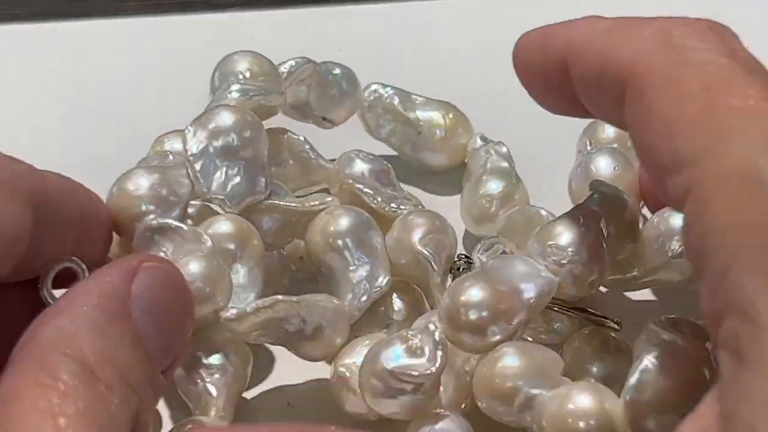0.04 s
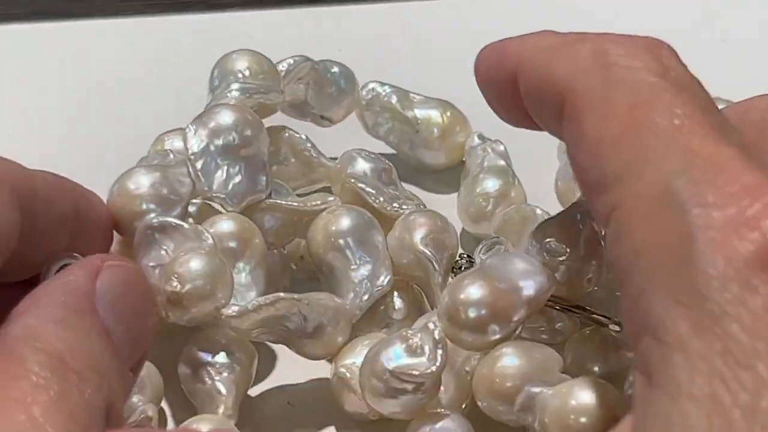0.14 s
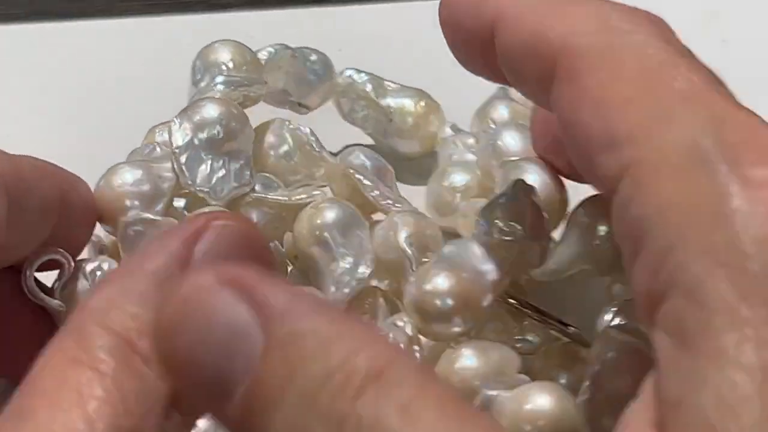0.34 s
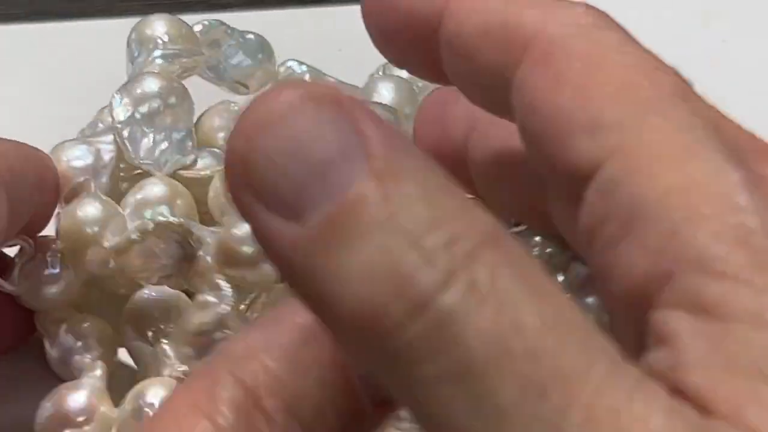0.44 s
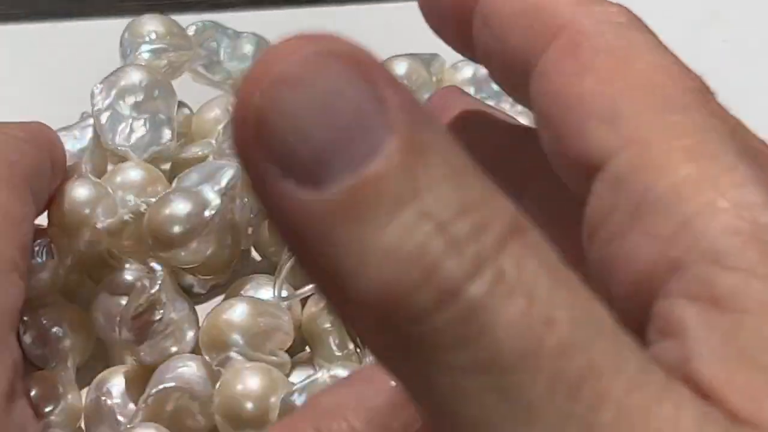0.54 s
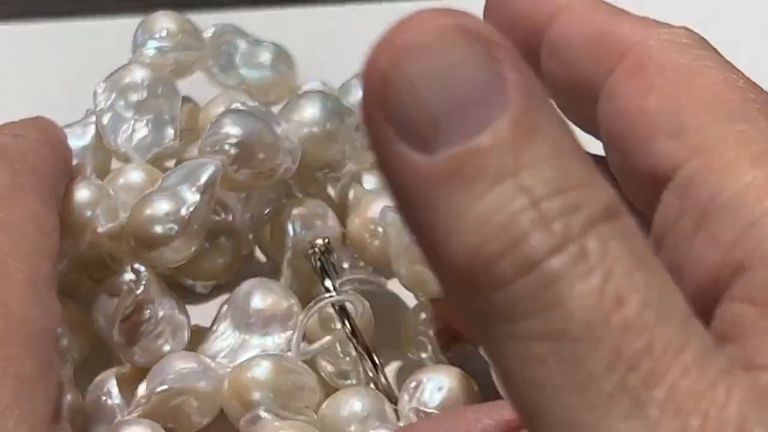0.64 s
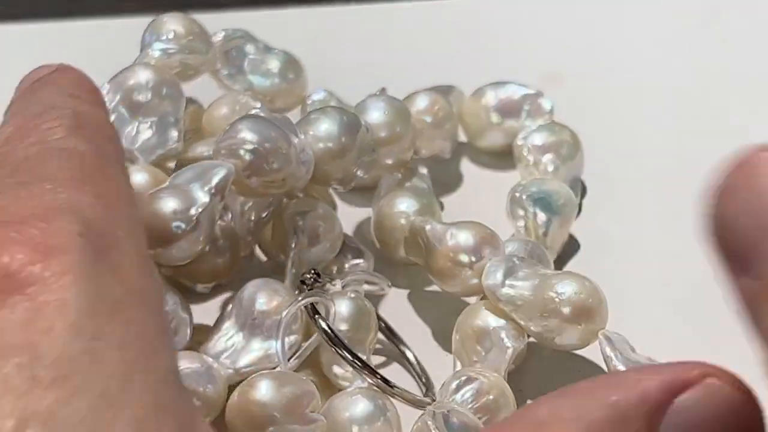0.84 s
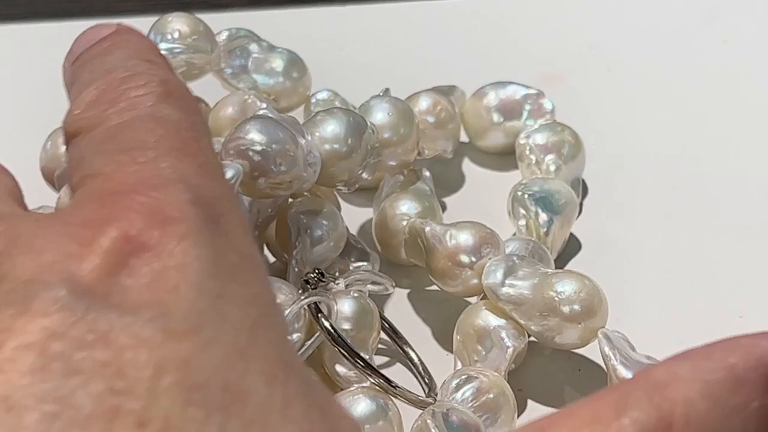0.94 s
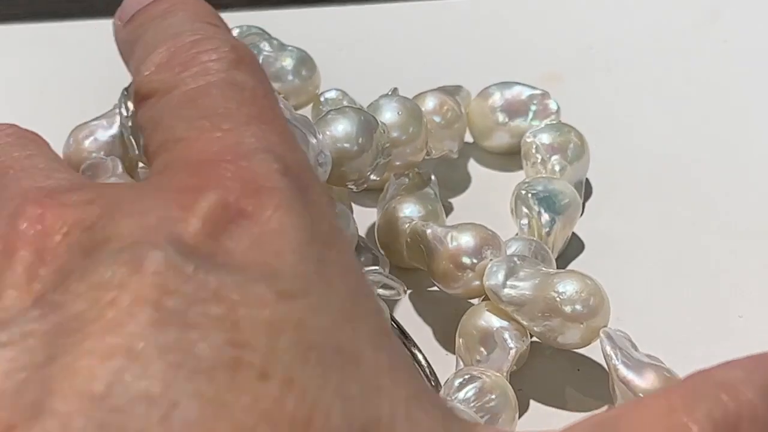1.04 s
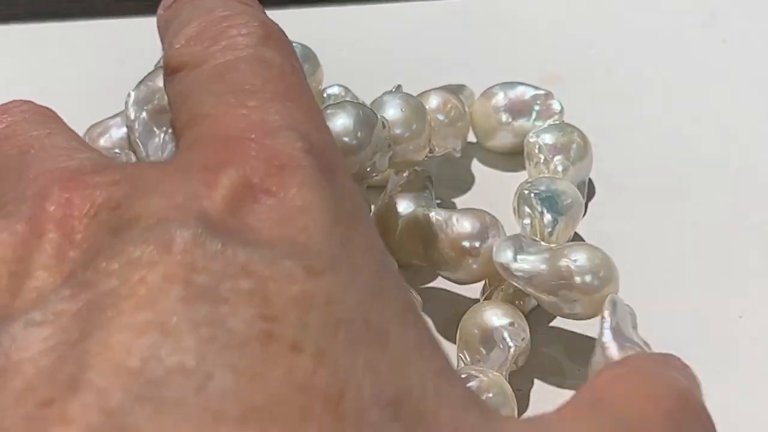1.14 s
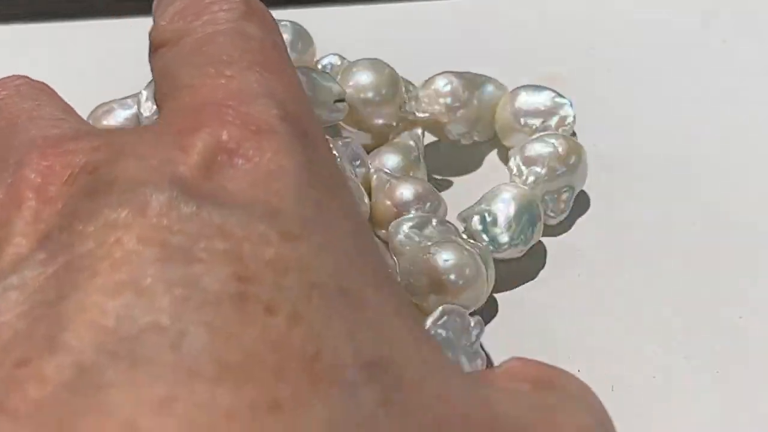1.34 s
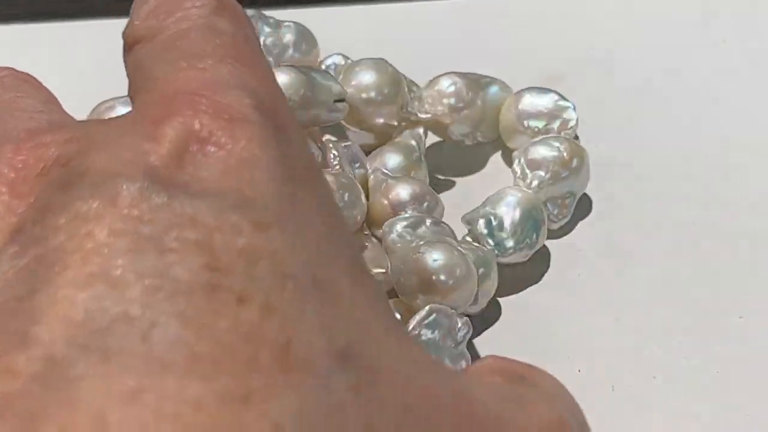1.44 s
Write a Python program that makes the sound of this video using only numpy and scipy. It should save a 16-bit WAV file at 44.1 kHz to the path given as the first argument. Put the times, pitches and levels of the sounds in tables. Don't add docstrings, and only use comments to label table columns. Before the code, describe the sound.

Pearl beads click and rattle in a quick flurry as hands turn the strands, then settle with a heavy double thump on a thin board before a second, lighter clatter; close stereo phone in a small, dry room.

```python
import sys
import numpy as np
from scipy import signal
from scipy.fft import rfft, irfft, next_fast_len
from scipy.io import wavfile
from scipy.ndimage import uniform_filter1d, map_coordinates

SR = 44100
rng = np.random.default_rng(int(sys.argv[2]) if len(sys.argv) > 2 else 0)


def volts_from_decibels(level):
    exponent = np.asarray(level, float) / 20
    return 10 ** exponent


def persist_wave(psi):
    counts = np.round(np.clip(psi, -1, 1) * 32767).astype(np.int16)
    wavfile.write(sys.argv[1], SR, np.atleast_2d(counts).T)


N = 66150
LEAD = 128


def unit(x):
    return x / np.sqrt(np.mean(x ** 2) + 1e-20)


def along(points, hz):
    f, v = np.transpose(points)
    return np.interp(np.log(hz + 1), np.log(f + 1), v)


def curve(rows):
    return np.interp(np.arange(N) / SR, *np.transpose(rows))


def wobble(rate):
    return map_coordinates(rng.standard_normal(N // 100), [np.arange(N) * rate / SR])


def filtered(x, response):
    m = next_fast_len(x.shape[-1] + 8192)
    f = np.fft.rfftfreq(m, 1 / SR) + 1e-3
    return irfft(rfft(x, m) * response(f), m)[..., :x.shape[-1]]


def noise(response):
    return filtered(rng.standard_normal(N), response)


def modes(table, f):
    return sum(volts_from_decibels(db) * 1j * f * w / (c * c - f * f + 1j * f * w) for c, w, db in table)


def place(times, grains):
    at = np.round(np.asarray(times) * SR).astype(int)[:, None] + np.arange(grains.shape[1])
    return np.bincount(np.clip(at, 0, N).ravel(), grains.ravel(), N + 1)[:N]


def place_contacts(s, db, grains):
    peak = np.abs(grains).max(axis=1, keepdims=True)
    return place(s - LEAD / SR, volts_from_decibels(db)[:, None] * grains / peak)


# time in seconds, level in dB.
HUM_LEVEL = [(0, -44.5), (.25, -43), (.45, -38), (.65, -41), (.76, -40.5), (1, -47.5), (1.3, -43.5),
             (1.5, -42.5)]
# centre in Hz, width in Hz, level in dB.
HUM_TONES = [(52.9, 9.85, -3.5), (77.73, 13.5, -5), (96.2, 23, -15), (149, 40.5, -16)]
# frequency in Hz, level in dB per Hz.
HISS_COLOUR = [(100, 19), (300, -5.5), (1500, -36), (2000, -56), (5000, -36), (8000, -31), (12000, -20),
               (16000, -33)]
HUM_ROUGH_DB, HISS_DB = -11, -60.5


def hum():
    t = np.arange(N) / SR
    drone = 0
    for hz, width, db in HUM_TONES:
        level = volts_from_decibels(db + 2.8 * wobble(14.2))
        drift = 0.286 * width * np.cumsum(wobble(16)) / SR
        drone = drone + level * np.sin(2 * np.pi * (hz * t + drift))
    skirt = noise(lambda f: modes(HUM_TONES, f) / (1 + (42 / f) ** 8))
    hiss = unit(noise(lambda f: volts_from_decibels(along(HISS_COLOUR, f)) / (1 + (90 / f) ** 6)))
    rough_drone = unit(unit(drone) + volts_from_decibels(HUM_ROUGH_DB) * unit(skirt))
    return rough_drone * volts_from_decibels(curve(HUM_LEVEL)) + hiss * volts_from_decibels(HISS_DB + 0.68 * wobble(4.2))


# time in seconds, level in dB.
DRAG = [(0, -45.5), (.03, -67), (.26, -66.5), (.31, -46), (.365, -47), (.4, -43), (.47, -51.5), (.55, -55),
        (.72, -54), (.84, -65), (.95, -58), (1.08, -66), (1.13, -54.5), (1.188, -41.5), (1.26, -53.5),
        (1.34, -55.5), (1.39, -66.5), (1.5, -54)]
# frequency in Hz, level in dB per Hz.
SCRAPE_COLOUR = [(80, -11), (200, -3), (300, -3), (480, -1), (1000, -13), (1700, -19), (2100, -35),
                 (3500, -77)]
# frequency in Hz, level in dB.
BEAD_COLOUR = [(300, -28), (900, -2.5), (2000, -8), (3500, 1.5), (7000, 1), (10000, 2), (14000, -4),
               (16300, -7)]
SCRAPE_DB, FIZZ_DB = 1.5, -13.5


def scrape():
    low = unit(noise(lambda f: volts_from_decibels(along(SCRAPE_COLOUR, f))))
    fizz = unit(noise(lambda f: volts_from_decibels(along(BEAD_COLOUR, f))))
    drag_db = curve(DRAG)
    low = low * volts_from_decibels(drag_db + SCRAPE_DB + 3.13 * wobble(90))
    return low + fizz * volts_from_decibels(drag_db + FIZZ_DB + 5.2 * wobble(220))


# start in seconds, peak in dB,
# hardness in dB per octave, ring of the spot in Hz.
DROPS = [(0.065, -41, 5, 1430), (0.115, -43.5, -3, 340), (0.128, -50, 15, 1320), (0.17, -36.5, -3, 1410),
         (0.23, -39, -8, 350), (0.272, -41.5, -1.5, 260), (0.296, -34, 12, 950), (0.305, -29.5, -2, 370),
         (0.324, -29.5, 7, 840), (0.334, -28, -8, 540), (0.387, -32, -4, 440), (0.396, -34, -7, 500),
         (0.432, -44, 2, 600), (0.508, -39, -6, 840), (0.539, -36.5, -0.5, 610), (0.583, -34, -3, 580),
         (0.604, -22.5, -2, 528), (0.692, -40, -6, 480), (0.944, -43, -6, 300), (1.012, -48, 22, 1420),
         (1.108, -41, 5, 880), (1.118, -35.5, -12, 317), (1.165, -31, -8.5, 835), (1.219, -34, 6, 1270),
         (1.493, -38.5, -1, 890),
         (0.6728, -27.5, -1, 840),
    (0.7089, -24.5, -6, 430),
    (.762, -31.5, -3, 428),
    (0.814, -27, -12, 540),
    (1.4179, -41, 3.5, 1040),
    (1.396, -54, 23, 1400),
]
THUMPS = [
    (.7802, -11, -2.5, 520),
    (.7922, -13.5, -3, 500),
]
# centre in Hz, width in Hz, level in dB.
BOARD_MODES = [(311, 130, 4), (430, 48, -4.5), (563, 94, -1), (950, 144, 3), (1310, 490, -17)]
BEND_S = 0.002217
BOARD_TOP_HZ, BOARD_LOW_HZ, DROP_DB = 1335, 224, -0.5
SPOT_SPREAD_DB = 1.2
RING_DB, RING_WIDTH = 7.5, 0.23


def board():
    s, db, hard, ring = np.transpose(DROPS + THUMPS)
    blow = np.zeros((len(s), 4096))
    blow[:, LEAD] = 1
    spot = rng.standard_normal((len(s), len(BOARD_MODES), 1)) * SPOT_SPREAD_DB
    table = [(c, w, level + spot[:, k]) for k, (c, w, level) in enumerate(BOARD_MODES)]
    table.append((ring[:, None], RING_WIDTH * ring[:, None], RING_DB))

    def response(f):
        travel = np.exp(-4j * np.pi * BEND_S * (np.sqrt(1000 * f) - 0.253 * f))
        edges = 1 / (1 + (f / BOARD_TOP_HZ) ** 8) / (1 + (BOARD_LOW_HZ / f) ** 6)
        hardness = volts_from_decibels(hard[:, None] * np.log2(np.clip(f, 200, 2000) / 550))
        return modes(table, f) * travel * edges * hardness

    return place_contacts(s, db + DROP_DB, filtered(blow, response))


CRACK_T60, RISE_S, LUMPY_DB = 0.005, 0.001, 4


def clicks(s, db, bright):
    t = np.arange(768) / SR
    fade = volts_from_decibels(-60 * t / CRACK_T60) * (1 - np.exp(-t / RISE_S)) ** 2
    crack = rng.standard_normal((len(s), len(t))) * fade
    luck = rng.random((len(s), 2))
    phase, spacing_hz = luck[:, :1], 1500 + 1500 * luck[:, 1:]

    def colour(f):
        lumps = LUMPY_DB * np.cos(2 * np.pi * (phase + f / spacing_hz))
        tilt = bright[:, None] * np.log2(np.clip(f, 2400, None) / 6000)
        return volts_from_decibels(along(BEAD_COLOUR, f) + lumps + tilt)

    return place_contacts(s, db, filtered(np.pad(crack, ((0, 0), (LEAD, 0))), colour))


# start in seconds, peak in dB, brightness in dB per
MORE_CLICKS = [
    (0.3386, -38, -5),
    (.3824, -33, 2),
    (0.4127, -34, -1),
    (.4914, -35, 1),
    (0.5167, -34.5, -2),
    (0.525, -41.5, 0),
    (0.9431, -45.5, -5.5),
    (1.2801, -44, -4),
    (1.4494, -47, -13),
]
# start in seconds, peak in dB, pitch in Hz.
RINGS = [(.1296, -46, 4450), (0.1695, -44, 3720), (.3282, -17, 3450), (0.4101, -14, 3250),
         (.4304, -22, 7800), (0.4633, -20, 7400), (0.582, -25, 4200), (.7068, -45, 6000),
         (0.7594, -29, 7550), (1.1373, -35, 2700), (1.1534, -21, 4340), (1.1847, -24, 5700),
         (1.2206, -29, 5100), (1.2886, -16, 6040), (1.418, -25, 1890), (1.4165, -22, 2830),
         (1.4177, -38, 5100), (1.44, -33, 2700), (1.463, -33, 2850), (1.4738, -14, 2660),
         (1.4744, -23, 3940)]
PING_DB, PING_T60, PING_LATE_S = -12, 0.0058, 0.00122


def ticks():
    s, db, bright = np.transpose(MORE_CLICKS)
    at, ping_db, hz = np.transpose(RINGS)[:, :, None]
    t = np.arange(768) / SR
    fade = volts_from_decibels(ping_db + PING_DB - 60 * t / PING_T60) * (1 - np.exp(-t / RISE_S)) ** 2
    ping = fade * np.sin(2 * np.pi * hz * t)
    return clicks(s, db, bright) + place(at[:, 0] + PING_LATE_S, 4 * ping)


# start in seconds, peak in dB, brightness in dB per octave.
FIRST_TURN = [(0.0034, -32.5, -4), (0.0673, -53.5, -5), (0.0806, -46, 13), (0.1014, -38, 2),
              (0.1308, -45, -11), (0.1708, -42.5, -1.5), (0.208, -53, 17), (0.2972, -34.5, -2.5),
              (0.3015, -33.5, 2), (0.3061, -26, -3), (0.3135, -36, -5), (0.3221, -19, 1.5),
              (0.3246, -25, -3.5), (0.329, -19.5, -1.5), (0.3376, -48, -10), (0.3636, -33.5, -3),
              (0.3703, -34, -0.5), (0.38, -53, -10), (0.388, -23.5, 2), (0.3955, -23, 0), (0.4026, -21, 0),
              (0.4097, -21.5, 3), (0.4271, -27, -0.5), (0.431, -17, 3.5), (0.437, -31, -3),
              (0.4486, -30.5, -7.5), (0.4625, -14.5, 10.5), (0.476, -36, -5), (0.4838, -31.5, -2.5),
              (0.5077, -33.5, -4.5)]
SETTLING = [(0.5293, -28, 4.5), (0.539, -37.5, -5), (0.582, -28.5, 0.5), (0.6039, -28.5, 0),
            (0.6073, -28, -4.5), (0.6619, -34.5, 2), (0.6724, -35, -5.5), (0.692, -30, 1), (0.702, -38, 8),
            (0.7066, -26, 3), (0.7185, -40, -3), (0.7445, -39, -3), (0.7602, -34.5, 1), (0.7828, -41.5, -4),
            (0.793, -38.5, -1), (0.828, -45, -4.5), (0.9287, -41, 0.5), (0.9496, -37, -0.5),
            (1.0122, -48, 0), (1.0745, -64, 10), (1.1073, -43, -7), (1.1199, -37.5, -3.5), (1.126, -45, -8),
            (1.1375, -32.5, -23)]
SECOND_TURN = [(1.1542, -25, -4.5), (1.1648, -28, 0), (1.1687, -35, -7), (1.1773, -30.5, -4),
               (1.186, -23.5, 0.5), (1.1905, -26, 1), (1.1973, -23, 2), (1.202, -37, 0), (1.2105, -36, -1),
               (1.2212, -28.5, -2.5), (1.2373, -31, -1), (1.2454, -28.5, -2.5), (1.2563, -32, 0),
               (1.2915, -28.5, 1), (1.2971, -43.5, -2), (1.329, -46, -6), (1.3386, -31, 3.5),
               (1.3965, -46.5, -19), (1.4177, -26, -7), (1.427, -45, -13), (1.437, -34.5, -19),
               (1.4401, -35, -20), (1.4614, -36, -12), (1.4746, -23.5, -5.5), (1.4872, -29, -17),
               (1.4944, -34, -2)]
CLICK_DB = -1
RATTLE_PER_S, RATTLE_DB, RATTLE_GROWS, RATTLE_SPREAD_DB = 700, -4, 1.38, 3.5


def beads():
    s, db, bright = np.transpose(FIRST_TURN + SETTLING + SECOND_TURN)
    clear = clicks(s, db + CLICK_DB, bright)
    drag_db = curve(DRAG)
    hardest_db = drag_db.max()
    luck = rng.random((int(RATTLE_PER_S * N / SR), 3))
    at = luck[:, 0] * (N - 1)
    size_db = hardest_db + RATTLE_GROWS * (drag_db[at.astype(int)] - hardest_db)
    size_db = size_db - RATTLE_SPREAD_DB * np.log(luck[:, 1])
    return clear + clicks(at / SR, size_db + RATTLE_DB, 6 * luck[:, 2] - 3)


def smear(x, t60, count):
    t = np.arange(SR // 8) / SR
    tails = rng.standard_normal((count, len(t))) * volts_from_decibels(-60 * t / t60)
    tails = tails / np.linalg.norm(tails, axis=1, keepdims=True)
    stretch = np.arange(N) * (count - 1) / N
    share = np.clip(1 - np.abs(stretch - np.arange(count)[:, None]), 0, 1)
    return signal.fftconvolve(x * np.sqrt(share), tails, axes=1).sum(axis=0)[:N]


# frequency in Hz, level of the unlike part in dB.
APART = [(60, -11.5), (200, -19.5), (700, -13.5), (1500, -23), (3500, -11), (6500, -12), (10000, -15),
         (13500, -10)]


def unlike(mid):
    z = signal.stft(mid, nperseg=256)[2]
    turn = uniform_filter1d(rng.standard_normal(z.shape), size=5, axis=0)
    turn = uniform_filter1d(turn, size=9, axis=1)
    turned = signal.istft(z * np.exp(3j * unit(turn)), nperseg=256)[1][:N]
    return filtered(turned, lambda f: volts_from_decibels(along(APART, f)))


ROOM_T60, ROOM_DB = 0.062, -10
BEAD_ROOM_DB = -5


def scene():
    click = beads()
    knock = board() + scrape()
    room = smear(knock + volts_from_decibels(BEAD_ROOM_DB) * click, ROOM_T60, count=16)
    mid = click + knock + volts_from_decibels(ROOM_DB) * room + hum() + ticks()
    side = unlike(mid)
    return np.array([mid + side, mid - side])


# low edge in Hz, high edge in Hz, threshold in dB over
GATES = [(9150, 10750, 5), (15750, 17000, 12)]


def gated(x):
    hz, _, z = signal.stft(x.mean(axis=0), SR, nperseg=512, noverlap=384)
    muted = np.zeros(z.shape)
    for low, high, db in GATES:
        band = (hz > low) & (hz < high)
        size = np.linalg.norm(z[band], axis=0)
        muted[band] = size < volts_from_decibels(db) * np.median(size)
    return x - signal.istft(z * muted, SR, nperseg=512, noverlap=384)[1][:N]


# frequency in Hz, lead of the left port in radians.
PORT_PHASE = [(100, 0), (7400, -.2), (8200, -.8), (9200, -2.75), (10700, -3.5), (11600, -5.2),
              (13500, -6.3), (15800, -7.7)]
TOP_HZ, EDGE_HZ, EDGE_DB = 16600, 15900, -16


def ports(f):
    phase = np.exp(.5j * along(PORT_PHASE, f) * np.array([[1], [-1]]))
    return phase * (f < TOP_HZ) * volts_from_decibels(EDGE_DB * (f > EDGE_HZ))


def low_pass(x):
    return signal.sosfilt(signal.butter(12, 16620, fs=SR, output="sos"), x)


def record(dry):
    mix = gated(filtered(dry, ports))
    return low_pass(mix)


dry = scene()
out = record(dry)
persist_wave(out)
```